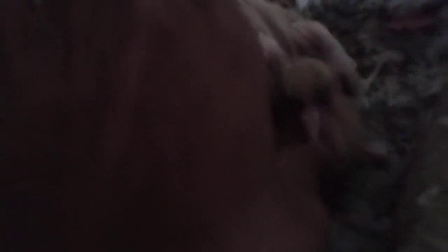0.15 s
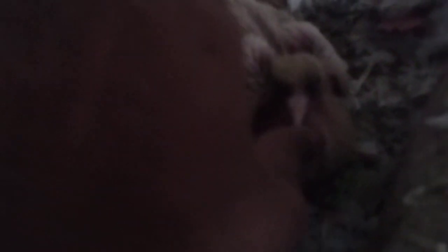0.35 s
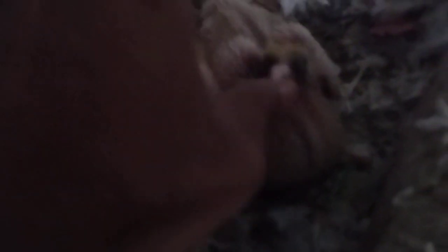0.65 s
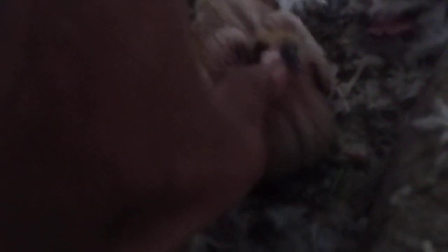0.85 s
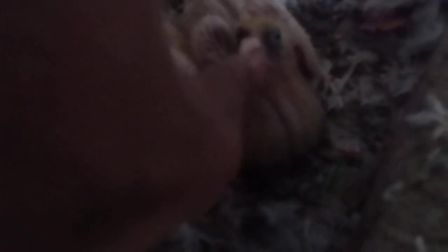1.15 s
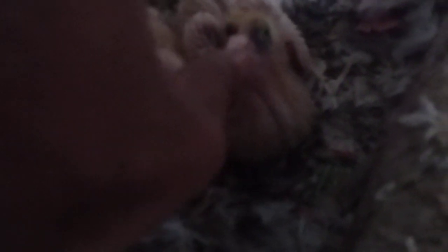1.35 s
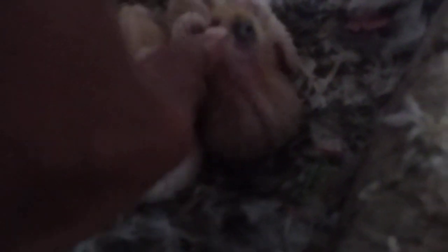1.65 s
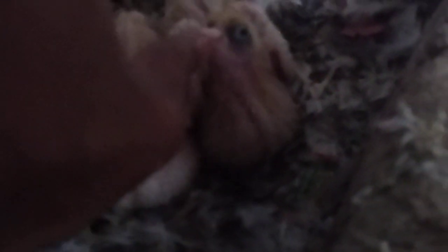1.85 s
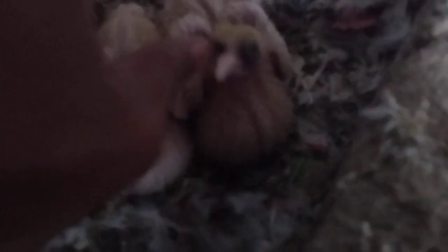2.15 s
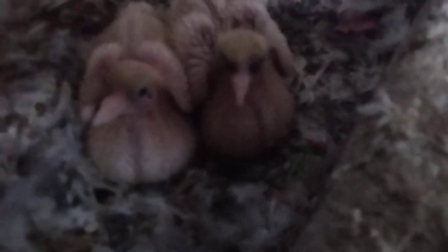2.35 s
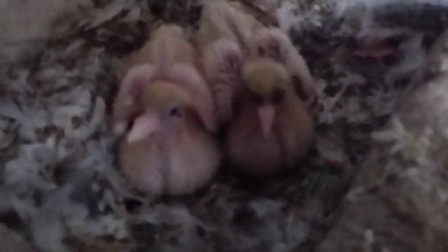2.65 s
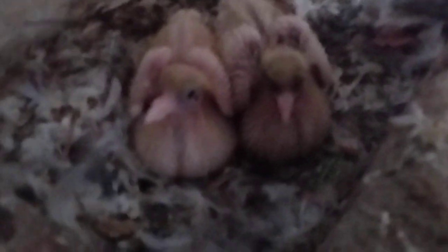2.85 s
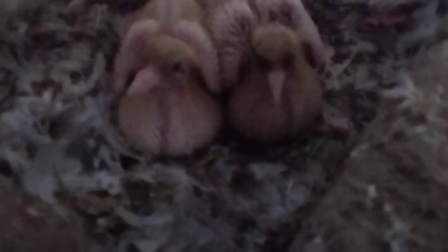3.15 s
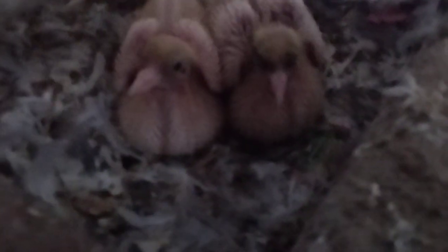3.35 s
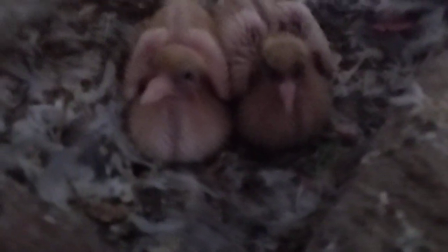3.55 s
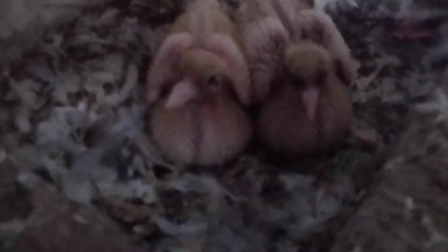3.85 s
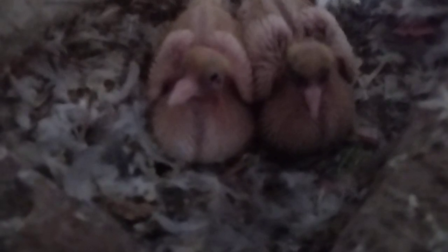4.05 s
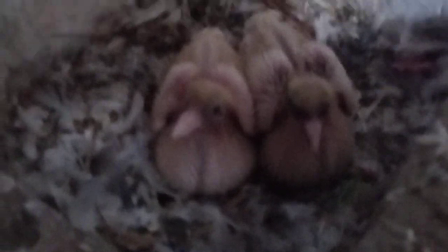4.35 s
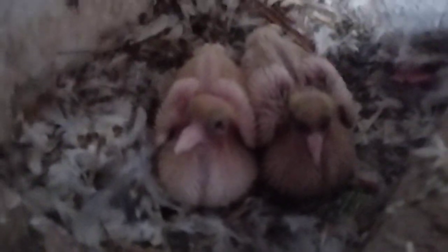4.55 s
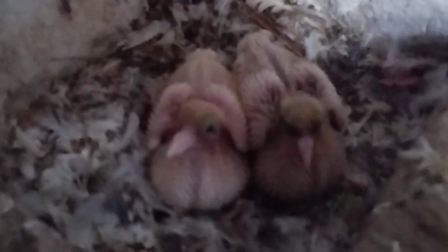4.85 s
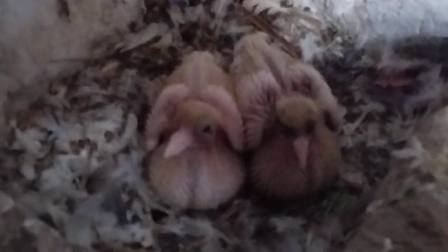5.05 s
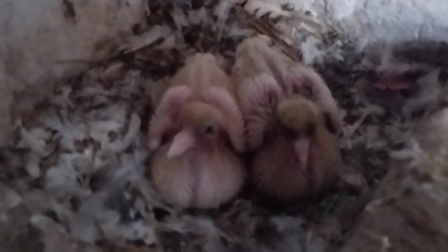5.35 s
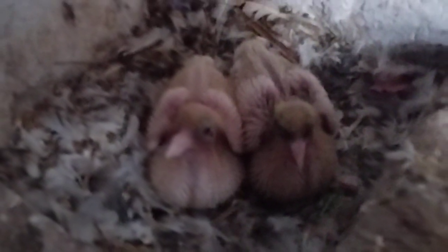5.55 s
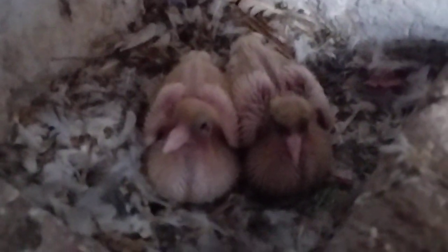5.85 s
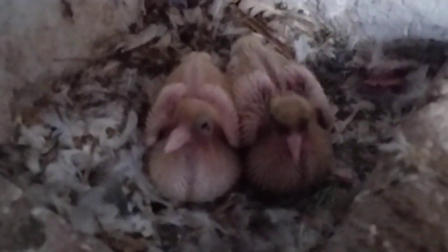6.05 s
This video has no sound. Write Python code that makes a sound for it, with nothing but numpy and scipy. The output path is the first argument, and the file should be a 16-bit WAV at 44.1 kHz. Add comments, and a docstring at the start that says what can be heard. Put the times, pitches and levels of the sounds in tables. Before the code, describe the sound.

Muffled, growling pigeon coos roll out in four phrases, broken by clear slides and tiny hiccups, while dry nest litter crackles faintly.

```python
"""A pigeon coos four times in a small loft: grunts, throbbing growls and murmurs are harmonics opened in
throbs, clear slides are gliding tones, and hoarse squeaks (hiccups) come between the notes.
Something rubs with a faint scratchy squeak of several high partials, after a fainter, higher one.
Close by, two nestlings stir dry litter, made of short noise snaps and scrapes, and a sleeve brushes past as
an arm draws back (swelling noise). Behind are a low hum, rumble and faint hiss, all filtered noise."""
import sys
import numpy as np
from scipy import signal
from scipy.fft import rfft, irfft, next_fast_len
from scipy.io import wavfile
from scipy.ndimage import uniform_filter1d

SR = 44100
rng = np.random.default_rng(int(sys.argv[2]) if len(sys.argv) > 2 else 0)


def dump_mix(stems):
    """Bounce the given channels to the path in sys.argv[1] as a 16-bit WAV at rate SR."""
    frames = np.atleast_2d(stems).T  # one column per channel
    limited = np.clip(frames, -1, 1)  # hard clip at full scale
    pcm = np.round(limited * 32767).astype(np.int16)
    wavfile.write(sys.argv[1], SR, pcm)


N = 273023
T = np.arange(N) / SR   # time of every sample in seconds


def from_db(db):
    """Turn decibels into a gain."""
    return 10 ** (np.asarray(db) / 20)


def rms_one(x):
    """Scale a sound to an rms of 1."""
    return x / np.sqrt(np.mean(x ** 2) + 1e-20)


def in_time(rows):
    """Draw each column of a table as a curve over time; the first column is the time in seconds."""
    s, *columns = np.transpose(rows)
    return [np.interp(T, s, c) for c in columns]


def during(start, end, fade_s):
    """A gate fully open from start to end, with fades just outside."""
    fade_in = np.clip((T - start) / fade_s + 1, 0, 1)
    fade_out = np.clip((end - T) / fade_s + 1, 0, 1)
    return fade_in * fade_out


def since(s):
    """Seconds gone by after a moment; zero before it."""
    return np.maximum(T - s, 0)


def until(s):
    """Seconds left before a moment; zero after it."""
    return np.maximum(s - T, 0)


def turns(hz):
    """Running phase in radians of a tone with a changing pitch."""
    return 2 * np.pi * np.cumsum(hz) / SR


def cut(x, hz, kind, order=2):
    """Keep part of the spectrum with a Butterworth filter."""
    return signal.sosfilt(signal.butter(order, hz, kind, fs=SR, output="sos"), x)


def smooth_low(x, hz, order):
    """Keep the lows without any delay, so that the highs can be found by subtracting."""
    return signal.sosfiltfilt(signal.butter(order, hz, fs=SR, output="sos"), x)


def drift(rate_hz):
    """Smooth random wandering with an rms of 1, no faster than about the given rate."""
    return rms_one(cut(rng.standard_normal(N + SR), rate_hz, "low")[SR:])


def resonate(x, hz, width_hz):
    """Ring at one pitch, with a gain of about 1 there; a narrow width rings longer."""
    r = np.exp(-np.pi * width_hz / SR)
    top = np.array([1, 0, -1]) * (1 - r * r) / 2
    return signal.lfilter(top, [1, -2 * r * np.cos(2 * np.pi * hz / SR), r * r], x)


def stereo_noise(side_db):
    """White noise with a part shared by both ears and a part opposed in the two."""
    mid, side = rng.standard_normal((2, N))
    return mid + from_db(side_db) * side * [[1], [-1]]


def coloured(spectrum, side_db):
    """Stereo noise shaped to a spectrum and scaled to an rms of 1."""
    hz, db = np.transpose(spectrum)
    size = next_fast_len(N)
    bins = np.maximum(np.arange(size // 2 + 1) * SR / size, 1)
    gain = from_db(np.interp(np.log(bins), np.log(hz), db, left=-120, right=-120))
    shaped = irfft(rfft(stereo_noise(side_db), size) * gain, size)
    return rms_one(shaped[:, :N])


def pan(left_db):
    """Gains of the two ears; the setting is left minus right in dB."""
    return from_db(np.array([[left_db], [-left_db]]) / 2)


LOFT_T60_S = 0.23   # time for the echo tail to fall by 60 dB


def loft(x, wet_db, apart=1):
    """Direct sound plus a short diffuse tail; a small "apart" makes the two ears hear more alike tails."""
    t = T[:SR // 2]
    decay = from_db(-60 * t / LOFT_T60_S) * (t > .003)
    mid, side = rng.standard_normal((2, len(t))) * decay
    tail = mid + apart * side * [[1], [-1]]
    tail /= np.sqrt(np.sum(tail ** 2, axis=1, keepdims=True))
    return x + from_db(wet_db) * signal.fftconvolve(np.atleast_2d(x), tail, axes=1)[:, :N]


def even(x):
    """Steady the loudness from throb to throb and bring the ears closer, keeping the throbs themselves."""
    power = uniform_filter1d(uniform_filter1d(x ** 2, size=1900), size=1500)
    return x / np.sqrt(np.maximum(power + power.mean(axis=0), 0) / 2 + 1e-9)


# How the strutting bird turns about.
# Each row: time in seconds, throat sound left minus right in dB.
FACING = [(0, 1.5), (.7, 3), (1.9, -2), (3.7, 0.5), (4.4, -5), (4.9, 5.5), (5.4, -2.5)]
CROP_LEFT_DB = .3   # crop sound, left minus right


def pigeon(split_hz=420, low_hz=165, top_hz=603, leak_db=-27, strain=1.396,
           crop_gain_db=0.11, throat_gain_db=-0.65, slide_db=0.5):
    """The growl sounds through the swollen crop and the throat, joined by slides; the shut beak dulls it."""
    crop_db, throat_db, pitch, rough, throbs = phrasing()
    lift, push_db = surges()
    crop_db, throat_db = crop_db + push_db, throat_db + push_db
    call = growl(pitch * (1 + lift), rough, throbs)
    voice = loft(call, wet_db=-8, apart=1.3) + standing_waves(call)

    muffled = cut(cut(voice, low_hz, "high", order=4), top_hz, "low", order=9)
    crop = smooth_low(muffled, split_hz, order=5)
    throat = muffled - crop
    # overtones grow faster than the note itself when the bird pushes
    overtones = cut(cut(voice, 2600, "high", order=4), [850, 1500], "band")
    leak = from_db(leak_db + strain * throat_db) * even(overtones)

    left_db, = in_time(FACING)
    ears = from_db(np.array([left_db, -left_db]) / 2)
    forward = from_db(throat_db + throat_gain_db) * even(throat)
    forward = forward + from_db(slide_db) * slides(rough, throbs)
    chest = from_db(crop_db + crop_gain_db) * even(crop) * pan(CROP_LEFT_DB)
    return chest + forward * ears + leak


# The growls: each coo has a main growl and a weaker closing one, usually shorter.
# Each row: start, peak and end in seconds, crop level in dB and throat level in dB (both before surges and
# final gains), top pitch in Hz before the throbs bend it, arch of the pitch in Hz per second squared,
# roughness from 0 to 1, first throbs per second, slowing per second.
GROWLS = [(0.402, 0.612, 0.8, -34.5, -29.5, 317.9, 1000, 0.72, 38.7, 2.13),
          (0.968, 0.983, 1.067, -46.5, -39.5, 307.8, 980, 0.78, 35.3, 0.077),
          (1.704, 1.866, 2.107, -30, -35, 280.5, 598.7, 0.66, 30.2, 1.16),
          (2.231, 2.286, 2.425, -33, -36.5, 282.8, 2274, 0.63, 23.5, 1.38),
          (3.445, 3.563, 3.825, -29.5, -31.5, 282.2, 61.8, 0.61, 26.7, 0.14),
          (3.991, 3.994, 4.15, -34.5, -37, 287.6, 597.8, 0.54, 18.85, 1.2),
          (4.752, 4.879, 5.085, -30.5, -31.5, 278.1, 705.6, 0.67, 25.4, 0.11),
          (5.306, 5.348, 5.64, -38.5, -47.5, 260.6, 1002, 0.5, 34.1, 2.18)]
# The short grunt ahead of each coo.
# Each row: start in seconds, crop level in dB, throat level in dB (both before surges and final gains).
GRUNTS = [(0.268, -41, -42), (1.552, -38, -41), (3.301, -36.5, -41.5), (4.601, -35, -41)]
# Soft murmurs between the louder notes.
# Each row: start and end in seconds, crop level in dB and throat level in dB (both before swell, surges and
# final gains), pitch in Hz before the throbs bend it, roughness from 0 to 1.
MURMURS = [(0, 0.179, -44, -60, 225.6, 0.86), (0.818, 0.961, -44.5, -43.5, 267.4, .65),
           (1.384, 1.536, -43.5, -50.5, 261.6, 0.81), (2.487, 2.518, -47, -49, 262.7, 0.72),
           (3.074, 3.304, -42.5, -80, 215.2, 0.8), (3.931, 3.975, -41.5, -40, 290.4, 0.59),
           (4.188, 4.318, -46, -48, 282.9, 0.53), (4.386, 4.575, -41.5, -61, 244.5, 0.7),
           (4.679, 4.751, -43.5, -50.5, 265.3, 0.67), (5.109, 5.192, -53.5, -43, 255.8, 0.48),
           (5.231, 5.281, -59, -46, 340, 0.35)]
GRUNT_S, GRUNT_HZ, GRUNT_ROUGH, GRUNT_THROBS_PER_S = 0.0441, 282.3, .75, 30


def phrasing():
    """The strongest note holds the voice: crop dB, throat dB, pitch, roughness and running throb count."""
    notes = [growled_note(*row) for row in GROWLS] + [soft_note(*row) for row in MURMURS]
    for s, crop, throat in GRUNTS:
        notes.append(growled_note(s, s, s + GRUNT_S, crop, throat, GRUNT_HZ, 0,
                                  GRUNT_ROUGH, GRUNT_THROBS_PER_S, 0))
    voice = notes[0]
    for note in notes[1:]:
        stronger = np.maximum(note[0], note[1]) > np.maximum(voice[0], voice[1])
        voice = [np.where(stronger, new, old) for new, old in zip(note, voice)]
    # smooth the hand-over between notes, but not the throb count
    return [uniform_filter1d(control, size=260) for control in voice[:4]] + [voice[4]]


# a growl builds up to its peak, then tires
SWELL_DB_PER_S, CROP_SAG_DB_PER_S, THROAT_SAG_DB_PER_S = 58, 28, 14.5
PITCH_TOP_SHARE = .62   # share of the growl at which the arch of its pitch tops out
SCOOP_HZ_PER_S2 = 2000   # a growl starts flat and climbs to pitch as it swells


def growled_note(start, peak, end, crop_db, throat_db, hz, arch, rough, per_s, slowing):
    """A growl swells and tires; its pitch follows an arch and its throbs can slow down."""
    edges, swell = edges_db(start, end), -SWELL_DB_PER_S * until(peak)
    crop = swell - CROP_SAG_DB_PER_S * since(peak)
    throat = swell - THROAT_SAG_DB_PER_S * since(peak)
    top = start + PITCH_TOP_SHARE * (end - start)
    pitch = hz - arch * (np.clip(T, start, end) - top) ** 2 - SCOOP_HZ_PER_S2 * until(peak) ** 2
    throbs = per_s * (T - start) / (1 + abs(slowing) * since(start) / 2)
    return crop_db + crop + edges, throat_db + throat + edges, pitch, rough, throbs


ATTACK_DB_PER_S, RELEASE_DB_PER_S = 1396, 153


def edges_db(start, end):
    """A note starts abruptly and dies away after its end."""
    return -ATTACK_DB_PER_S * until(start) - RELEASE_DB_PER_S * since(end)


MURMUR_SWELL_DB_PER_S, MURMUR_ATTACK_DB_PER_S = 13.5, 140
SOFT_THROBS_PER_S, SOFT_UNEVEN = 33, 0.4975   # average rate, and its wandering as a share


def soft_note(start, end, crop_db, throat_db, hz, rough):
    """A murmur fades in, swells gently towards its end at a steady pitch and throbs unevenly."""
    level = -MURMUR_ATTACK_DB_PER_S * until(start) - RELEASE_DB_PER_S * since(end)
    level += MURMUR_SWELL_DB_PER_S * (np.clip(T, start, end) - (start + end) / 2)
    throb_rate = SOFT_THROBS_PER_S * (1 + SOFT_UNEVEN * drift(20.2))
    throbs = np.cumsum(throb_rate * (T > start)) / SR
    return crop_db + level, throat_db + level, hz, rough, throbs


# Single throbs that burst out of the voice.
# Each row: time in seconds, pitch rise as a share, extra level in dB.
SURGES = [(.279, 0, 1), (.524, 0.028, 3.5), (.637, 0.11, 2), (0.681, 0.078, 2), (.745, 0.017, 3.5),
          (.99, 0.1213, 5.5), (1.711, 0.032, 4.5), (1.929, 0.14, 2.5), (1.969, 0.14, 1), (2.03, 0.16, 2),
          (2.372, 0.25, 3.5), (3.322, 0.0031, 2.5), (3.457, 0.086, 1.5), (3.598, 0, 4.5),
          (3.712, 0.0056, 5), (3.78, 0, 8), (4.872, 0.029, 1.5), (4.909, 0.057, 0.5), (5.102, 0, 4)]
SURGE_S = .012   # half length of a surge


def surges():
    """The hardest throbs overshoot: extra pitch as a share, and extra dB."""
    lift, push_db = np.zeros((2, N))
    for s, share, db in SURGES:
        bump = np.exp(-np.minimum(((T - s) / SURGE_S) ** 2, 50))
        lift += share * bump
        push_db += db * bump
    return lift, push_db


def growl(pitch, rough, throbs, bend=.28, fall=1.9, rise=.13, octave_db=-1, third_db=-10,
          shimmer_db=4.5, rasp_db=-1.0, stumble=0.05):
    """The syrinx opens in throbs: each starts sharply and high, then sags in level and pitch."""
    rough = np.clip(rough, 0, 1)
    cycle = (throbs + stumble * drift(16.6)) % 1   # place within the throb, 0 to 1
    throb = (1 - np.exp(-(cycle / rise) ** 2)) * np.exp(-fall * cycle) * (1 - cycle ** 8)
    throb /= throb.max()
    jitter = .08 * drift(130)
    phase = turns(pitch * (1 + rough * (bend * (throb - .65) + jitter)))
    tone = np.sin(phase) + from_db(octave_db) * np.sin(2 * phase) + from_db(third_db) * np.sin(3 * phase)
    # uneven cycles smear sound between and under the first two harmonics
    between = drift(280) * np.sin(phase + phase / 2)
    under = .5 * drift(190) * np.sin(phase / 2)
    rasp = rough * from_db(rasp_db) * (between + under)
    depth = rough ** .7
    opening = 1 - depth + depth * throb
    shimmer = from_db(shimmer_db * rough * drift(110))
    return rms_one((tone + rasp) * opening * shimmer)


# The clear slides, one list for each slide.
# Each row: time in seconds, pitch in Hz before it wavers, level in dB before the slide gain and panning.
SLIDES = [
    [(.85, 601.6, -45), (.888, 556.8, -36.5), (.92, 471.5, -36.5), (.95, 392.7, -41.5), (1.02, 381, -36.5),
     (1.07, 361, -50)],
    [(2.1, 590.5, -53), (2.14, 555, -47), (2.157, 545, -34.5), (2.178, 504.4, -38)],
    [(2.19, 349.8, -35), (2.215, 338.7, -41.5)],
    [(3.61, 323.7, -41), (3.65, 385.3, -29), (3.71, 414.6, -37), (3.79, 398.6, -36), (3.86, 428.7, -32),
     (3.92, 497.4, -36.5), (3.97, 524, -38.5)],
    [(4.105, 429, -37.5), (4.15, 348, -42)],
    [(4.21, 643.4, -51.5), (4.26, 657, -48.5), (4.3, 678.3, -55)],
    [(5.07, 402.4, -35.5), (5.15, 387.7, -35.5), (5.205, 375.7, -51.5), (5.245, 342.4, -30.5),
     (5.3, 331.6, -38)],
    [(5.31, 507, -33), (5.41, 489, -38.5), (5.5, 500.3, -40.5), (5.56, 495, -50.5), (5.66, 492.8, -63)],
]


def slides(rough, throbs, octave_db=-14, flutter_db=6.0, top_hz=690):
    """The voice breaks into a gliding tone that rolls with the throbs and quivers more where it is rough."""
    waver = rough * (.035 * drift(100) + .03 * np.sin(2 * np.pi * throbs))
    flutter = from_db(flutter_db * rough * drift(54))
    tone, level = np.zeros((2, N))
    for rows in SLIDES:
        pitch, db = in_time(rows)
        start, end = rows[0][0], rows[-1][0]
        phase = turns(pitch * (1 + waver))
        tone += during(start, end, 0.043) * (np.sin(phase) + from_db(octave_db) * np.sin(2 * phase))
        # the loudest slide sets the level
        level = np.maximum(level, from_db(db + np.maximum(edges_db(start, end), -100)))
    quivering = flutter * tone
    heard = loft(quivering, wet_db=-9, apart=.7) + .5 * standing_waves(quivering)
    return level * even(cut(heard, top_hz, "low", order=16))


# Standing waves of the nesting corner; opposite signs put a quiet spot between the ears.
# Each row: pitch in Hz, width in Hz, left gain, right gain.
CORNER = [(176.7, 12, 4.5, 2), (217.6, 8, 2, 1.9), (243.9, 5.3, 4, 1.5), (280.2, 9.7, 3.5, 1.77),
          (294, 33, 1.8, 0.42), (337.5, 19, 2.5, -3), (372.9, 5.4, 2.64, 3.5), (391.5, 14, -3, 3),
          (432.5, 14, 0.5, 0), (459.6, 8.8, 3.5, 1), (495.4, 5.2, 0.5, 6), (518, 8, 0.96, 1),
          (543.4, 5.4, 5.5, 0.4), (560.7, 3.8, 0.95, 1), (592, 4.8, 3, 1.5)]


def standing_waves(x):
    """The nesting corner rings on at its own pitches, differently at each ear."""
    return sum(np.array([[left], [right]]) * resonate(x, hz, width) for hz, width, left, right in CORNER)


# Small hiccups between notes.
# Each row: middle in seconds, half length in seconds, middle pitch in Hz before it wavers,
# level in dB before the final gain.
HICCUPS = [(0.006, 0.0058, 923, -59), (0.331, 0.012, 882, -68), (1.08, 0.021, 698, -58.5),
           (1.34, 0.048, 686.7, -62.5), (1.616, 0.014, 784, -58), (2.196, 0.017, 659, -50.5),
           (3.075, 0.038, 868, -68.5), (3.378, 0.021, 840, -68), (4.329, 0.019, 882, -54),
           (4.679, 0.0093, 734.4, -51.5)]
HICCUP_TOP_HZ = 1110   # the shut beak dulls the squeaks


def hiccups(climb=0.044, rough=0.082, level_db=3):
    """Brief hoarse squeaks: short tones that climb while their pitch wavers at random."""
    out = np.zeros(N)
    hoarse = rough * drift(90)
    for s, length, hz, db in HICCUPS:
        progress = (T - s) / length
        pitch = hz * (1 + climb * np.clip(progress, -2, 2) + hoarse)
        bump = np.exp(-np.minimum(progress ** 2, 50))
        out += from_db(db + level_db) * bump * np.sin(turns(pitch))
    return loft(np.sqrt(2) * cut(out, HICCUP_TOP_HZ, "low", order=8), wet_db=5.0)


# Partials of a scratchy squeak of something rubbing, and of one fainter, higher squeak.
# Each row: start and end in seconds, pitch in Hz before it wavers, level in dB before the scratchiness.
SQUEAK_PARTIALS = [(0.51, 0.598, 9400, -83), (0.714, 0.732, 3600, -70.5), (0.722, 0.765, 3060, -61.5),
                   (0.72, 0.755, 5740, -75), (0.735, 0.772, 6480, -74.5)]


def rubbing_squeaks(scratch_db=3):
    """Something rubs with a faint squeak: high partials whose pitch and level wander quickly."""
    waver = .008 * drift(300)
    partials = sum(from_db(db) * during(start, end, 0.012) * np.sin(turns(hz * (1 + waver)))
                   for start, end, hz, db in SQUEAK_PARTIALS)
    return loft(partials * from_db(scratch_db * np.tanh(drift(250))), wet_db=-3)


# Ticks of dry litter and small beaks.
# Each row: time in seconds, level of the bright part in dB, level of the dull part in dB (both before the
# tick gains and panning), ringing pitch in Hz.
TICKS = [(0.042, -51.5, -47.5, 6560), (0.065, -61, -69.5, 6500), (0.107, -59.5, -53.5, 6600),
         (0.137, -63.5, -75, 6230), (0.586, -94, -70.5, 2730), (1.075, -77, -60.5, 2700),
         (1.2304, -60, -79, 9500), (1.317, -85, -68, 2489), (1.586, -63, -62.5, 3494),
         (3.326, -67, -57.5, 2393), (3.653, -59.5, -86, 6525), (3.682, -61, -77.5, 6716),
         (3.697, -55, -49.5, 6770), (3.7208, -54, -80, 5900), (3.7404, -60.5, -55, 6300),
         (3.756, -62, -54.5, 4700), (3.807, -54.5, -54, 9800), (3.9127, -52.5, -57.5, 5950),
         (4.0355, -58.5, -85, 7100), (4.0533, -73.5, -56, 1750), (4.17, -61, -57.5, 1740),
         (5.038, -73, -57, 4364), (5.247, -65, -55, 7300), (5.512, -70, -53.5, 4986)]
# Tone colour of the ticks. Each row: frequency in Hz, relative level in dB.
TICK_COLOUR = [(710, -32.5), (1200, -8), (2530, -1.5), (3950, -13), (5780, -8), (11300, -19.5),
               (13600, -14), (16000, -14.5)]
# Longer scuffs of feet in the litter.
# Each row: start in seconds, length in seconds, level in dB before grain and panning, top frequency in Hz.
SCUFFS = [(0.724, 0.044, -71.5, 9100), (1.592, 0.013, -73, 7500), (2.238, .012, -70.5, 9000),
          (3.334, 0.029, -73.5, 12030), (4.042, 0.02, -82, 15000), (4.272, 0.038, -72.5, 14000),
          (5.048, 0.022, -72.5, 8000), (5.865, 0.014, -63.5, 3600), (5.962, 0.074, -77.5, 13000)]
# Tone colour of the scuffs. Each row: frequency in Hz, relative level in dB.
SCUFF_COLOUR = [(880, -30), (1500, -13), (2880, -7), (3090, -10.5), (3310, -11.5), (6690, -12), (8320, -23),
                (14600, -19.5), (16000, -31.5)]
TICK_RING_DB, TICK_RING_WIDTH_HZ = 9, 500   # each bit rings briefly at a pitch of its own


def litter(tick_s=0.0035, bright_db=-1, dull_db=-1, grain_db=16):
    """Dry bits snap and scrape under the nestlings: short ringing noise bursts and grainy longer ones."""
    crack = coloured(TICK_COLOUR, side_db=-1.5)
    bright = rms_one(cut(crack, 4500, "high"))
    dull = rms_one(cut(crack, 3800, "low", order=4))
    ticks = np.zeros((2, N))
    for s, high_db, low_db, hz in TICKS:
        near = slice(int(s * SR), int(s * SR) + SR // 20)
        age = T[near] - T[near][0]
        shape = np.exp(-age / tick_s) * (1 - np.exp(-age / 0.00027))
        snap = from_db(high_db + bright_db) * bright[:, near] + from_db(low_db + dull_db) * dull[:, near]
        snap = shape * snap
        ticks[:, near] += snap + from_db(TICK_RING_DB) * resonate(snap, hz, TICK_RING_WIDTH_HZ)

    grains = from_db(grain_db * np.tanh(drift(880))) * coloured(SCUFF_COLOUR, side_db=-4.0)
    scrape = np.zeros((2, N))
    for s, length, db, top_hz in SCUFFS:
        shape = during(s, s + length, 0.023) * np.exp(-np.clip((T - s) / length, 0, 2))
        scrape += from_db(db) * shape * cut(grains, min(top_hz, .45 * SR), "low", order=4)
    return loft(ticks + scrape, wet_db=-6) * pan(-3.5)


# The swell of the sleeve.
# Each row: time in seconds, level in dB before the sleeve gain, unevenness and panning.
SLEEVE = [(1.798, -85), (2.2, -75), (2.551, -67.5), (2.78, -59.5), (2.946, -64), (3.0, -71.5),
          (3.25, -82.5)]
# Tone colour of the cloth. Each row: frequency in Hz, relative level in dB.
SLEEVE_COLOUR = [(530, -34), (900, -15), (1300, -7.5), (1800, -8), (2350, -0.5), (3000, -6), (4600, -8.5),
                 (6700, -10), (8250, -20.5), (11000, -21.5), (14500, -12), (16000, -18.5)]


def sleeve(level_db=7.5, grain_db=0.4, uneven_db=1, brighten=0.17):
    """Cloth slides past on the right: noise that swells unevenly, brightest when loudest, then stops."""
    db, = in_time(SLEEVE)
    swell_db = db + level_db + grain_db * drift(210) + uneven_db * drift(8.6)
    rub = coloured(SLEEVE_COLOUR, side_db=1.0) * from_db(swell_db)
    upper = rub - smooth_low(rub, 2900, order=2)
    rub = rub + (from_db(brighten * (db - db.max())) - 1) * upper
    # the lower part leans further to the right than the treble
    body = smooth_low(rub, 6000, order=1)
    return during(SLEEVE[0][0], SLEEVE[-1][0], 0.031) * (body * pan(-9.0) + (rub - body) * pan(-.3))


# Level of the building's low sounds.
# Each row: time in seconds, deep rumble in dB before its gain, hum in dB.
RUMBLE = [(0, -44.5, -46), (0.6, -51.5, -47.5), (1.2, -45.5, -46.5), (2.4, -50.5, -47), (2.75, -42, -41.5),
          (3.05, -52, -43), (4.7, -45.5, -41), (5.7, -50, -45), (6.19, -43, -43.5)]
# Low room modes in which the hum booms.
# Each row: pitch in Hz, width in Hz, relative level in dB before it wanders.
HUM_MODES = [(52.5, 14, -3), (89.1, 8.3, 2), (117.7, 8.7, 0.5), (133.2, 10, -4), (175.8, 7.7, -4),
             (219.8, 2.4, -8)]


def building(deep_gain_db=-1, wander_db=2.5):
    """Noise booms in the low room modes as a wandering hum, over a deeper rumble."""
    deep_db, hum_db = in_time(RUMBLE)
    hum = sum(from_db(db + wander_db * drift(2.7)) * rms_one(resonate(stereo_noise(-20.5), hz, width))
              for hz, width, db in HUM_MODES)
    hum = rms_one(cut(hum, 260, "low", order=4))
    deep = rms_one(cut(stereo_noise(-15.0), [15, 27], "band"))
    return from_db(hum_db) * hum + from_db(deep_db + deep_gain_db) * deep


# Tone colour of the hiss. Each row: frequency in Hz, relative level in dB.
AIR = [(150, -22), (230, -10.5), (330, -9.5), (560, -6), (750, -12), (1300, -25), (2300, -25.5),
       (4000, -32.5), (6500, -36.5), (8000, -41), (11000, -46), (15000, -34.5), (16500, -48)]
AIR_DB = -60.5   # average level, before the lean


def hiss(swell_db=-0.07, lean=0.22):
    """Faint noise that slowly rises and sinks; its upper middle leans to the right."""
    air = coloured(AIR, side_db=-3.0)
    leaning = air + lean * resonate(air, 2600, 3300) * [[-1], [1]]
    return from_db(AIR_DB + swell_db * drift(1.2)) * leaning


def scene():
    """Everything in the loft, added together."""
    return pigeon() + hiccups() + rubbing_squeaks() + litter() + sleeve() + building() + hiss()


CUTOFF_HZ = 15900


def record(dry):
    """The very top of the treble is cut steeply."""
    return signal.sosfilt(signal.ellip(10, .1, 70, CUTOFF_HZ, fs=SR, output="sos"), dry)


dry = scene()
out = record(dry)
dump_mix(out)
```